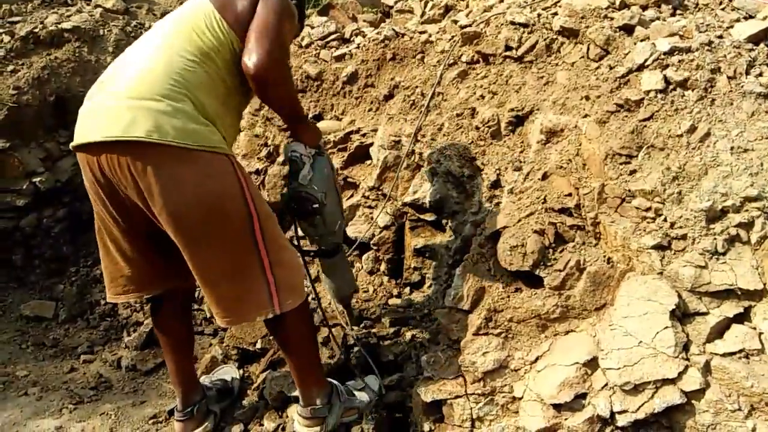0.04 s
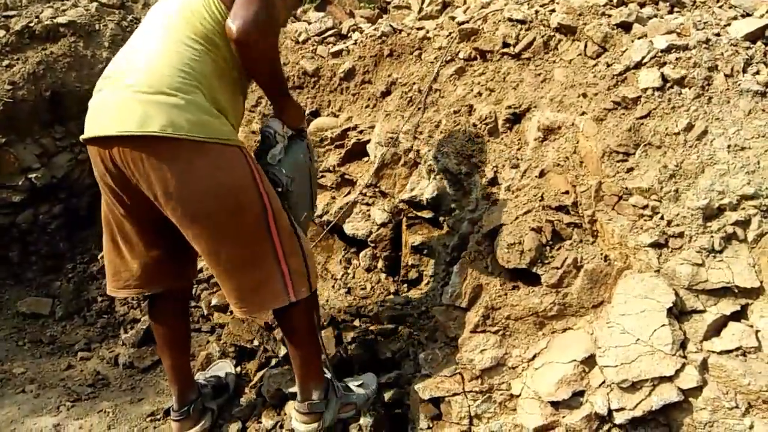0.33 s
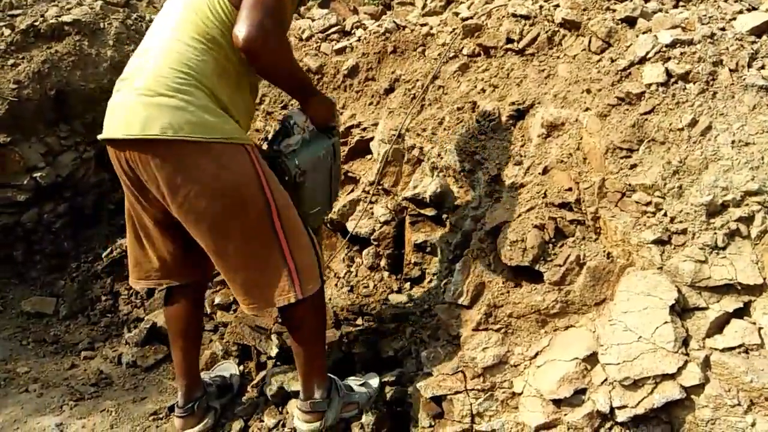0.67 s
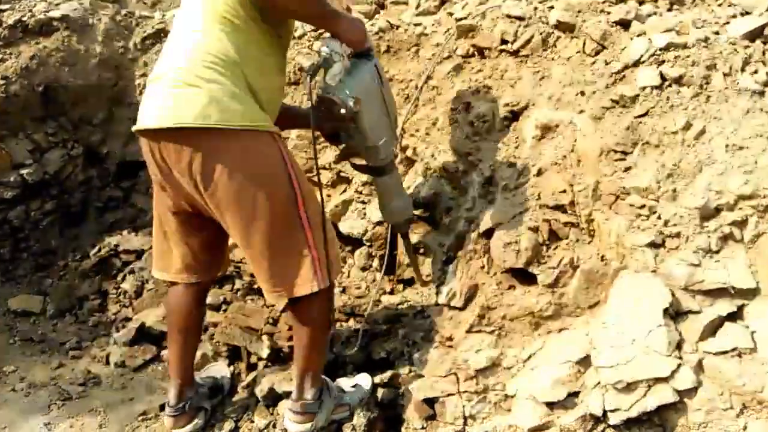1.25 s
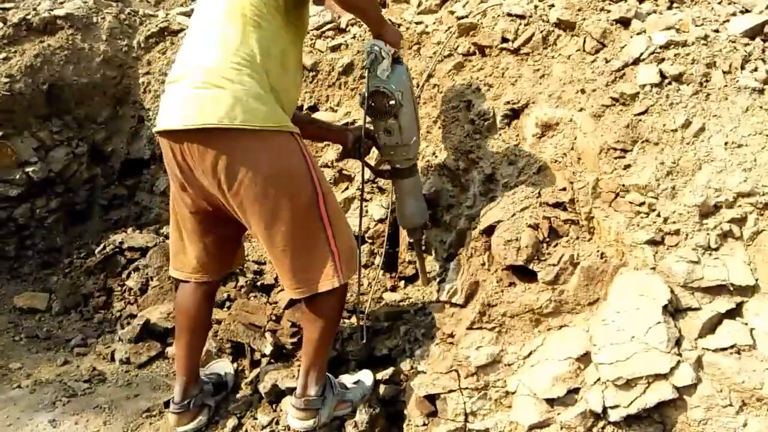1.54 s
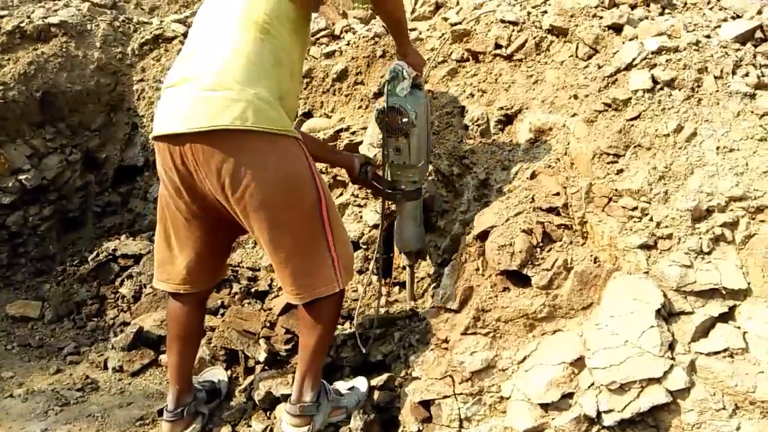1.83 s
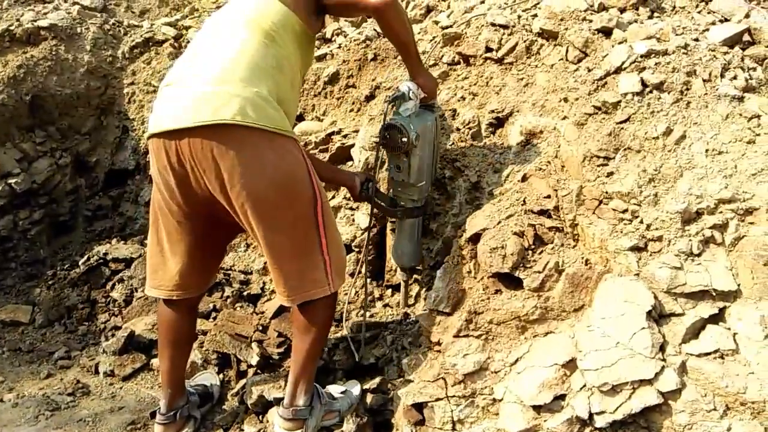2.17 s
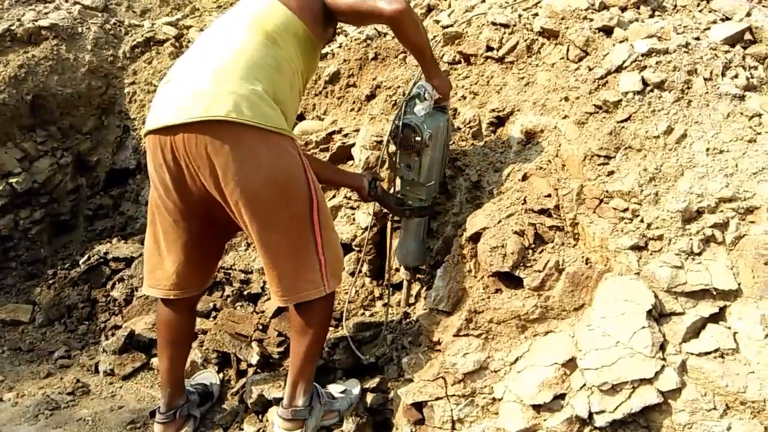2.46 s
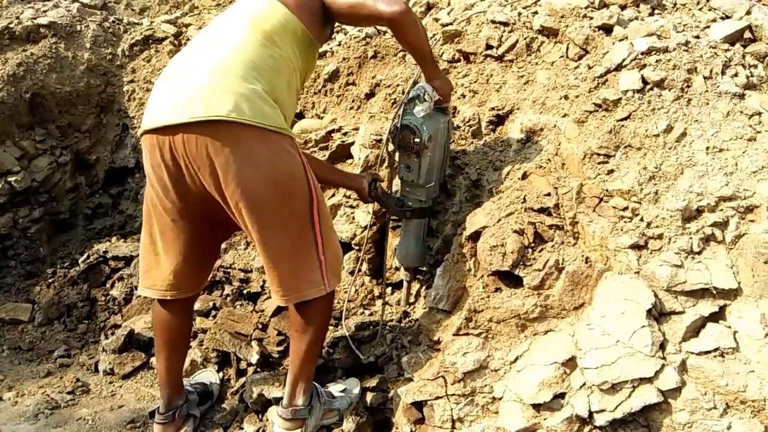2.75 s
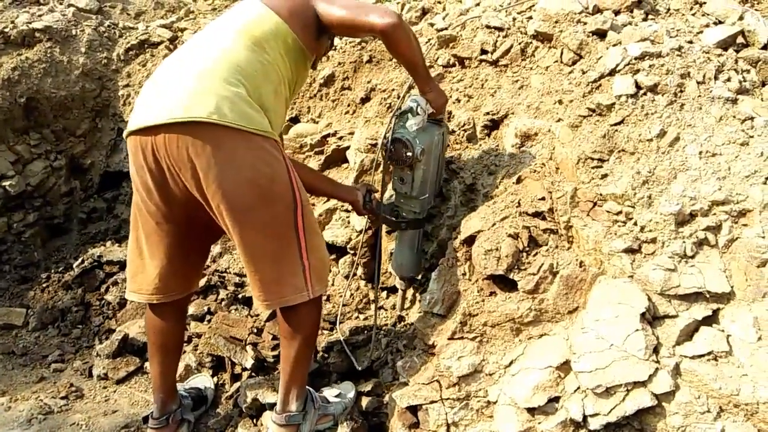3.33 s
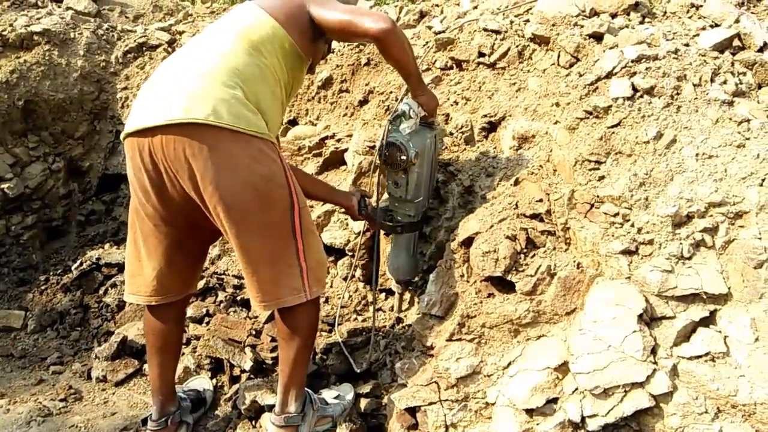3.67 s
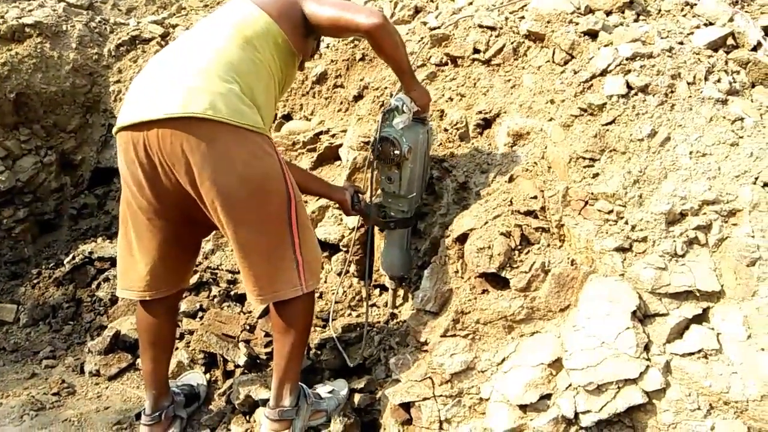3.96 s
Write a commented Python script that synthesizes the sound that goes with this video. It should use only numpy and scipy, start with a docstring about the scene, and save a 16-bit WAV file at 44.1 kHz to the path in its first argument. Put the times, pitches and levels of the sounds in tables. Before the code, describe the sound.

A handheld electric breaker clanks and scrapes as it is dragged over rocky ground outdoors, with wind bumping the microphone. Its motor then starts with a chattering whine and the chisel hammers rapidly into rock.

```python
"""Steel clanks and scrapes as a handheld electric breaker, winding down with a tiny squeak, is dragged
over rocky ground and set down, while air buffets the microphone. Its motor starts with a chattering
whine; the chisel rings loosely at first, then bites and hammers about 17 times a second. Each blow is
a thump of the piston in the housing, then the crack of steel on rock, thrown back by the rock face."""
import sys
import numpy as np
from scipy import signal
from scipy.io import wavfile
from scipy.ndimage import uniform_filter1d

SR = 44100
rng = np.random.default_rng(int(sys.argv[2]) if len(sys.argv) > 2 else 0)


def generate_wav(sig):
    """Save sig (samples, or channels by samples) to the path in sys.argv[1] as 16-bit PCM at SR."""
    pcm = np.round(np.clip(np.atleast_2d(sig).T, -1, 1) * 32767).astype(np.int16)
    wavfile.write(sys.argv[1], SR, pcm)


N = 176400

# chisel blows: t/s, strength/dB, extra ground thud/dB, extra brightness/dB
BLOWS = [(1.7701, -0.4, -0.5, 4.5), (1.848, 2.3, -7, 3.5), (1.916, 0.5, -4.5, 8), (1.9841, 1.2, 2.5, 5.5),
         (2.0487, -5, 2, 10), (2.1105, -3.5, 1, 3), (2.1702, -2.5, 4.5, 11.5), (2.2325, -1.8, -0.5, 6),
         (2.2923, 0.9, 8.5, 5.5), (2.3549, -0.8, 5, 3.9), (2.4142, 0.6, 1.8, 0.8), (2.474, -1.5, 4.8, 5.5),
         (2.5332, 1, 2, 2.5), (2.5917, 4.9, 0.5, -5.0), (2.65, 1.8, -3.2, 4.5), (2.7099, 5.5, -2, -5),
         (2.7688, 2.2, 1.3, -2), (2.8279, 4.8, -4, 1), (2.8873, 1.2, 6.5, 1.1), (2.9441, -5.5, 11, 10.5),
         (3.0048, -0.3, 5, 2), (3.062, -3, 1.4, 5), (3.1213, -3.5, 6.5, 3.7), (3.1804, 0, 4.5, -2.5),
         (3.2388, 2, 5, 2.8), (3.298, 1.5, 6, -2.5), (3.3543, 3.5, 0, -2.7), (3.4137, 0.3, 10.5, 1),
         (3.4721, 6.2, -1, -13.5), (3.5314, 0.5, 6.5, -2), (3.5896, 0.6, 7.5, -3), (3.6455, 0.2, 7.5, -1),
         (3.7056, -0.1, 9, -4.5), (3.763, 0, 6.5, -2), (3.8219, -1, 10.5, 1), (3.8794, -0.4, 4.5, 1.9),
         (3.939, 4.7, -10, -7.5), (3.9977, 4.5, 2.5, -2.5)]
# how firmly the chisel is pressed home: t/s, firmness (0 loose, 1 firm)
FIRMNESS = [(1.77, 0.22), (1.95, 0.052), (2.15, .33), (2.3, .7), (2.55, 0.64), (3.3, 0.65), (3.9, 0.94)]
# heavily damped modes of tool and rock: f/Hz, level/dB, t60/s
BODY_MODES = [(732, -17, 0.021), (936, -23.5, 0.021), (1106, -25, .04), (1328, -14, 0.0095),
              (1717, -10, 0.013), (2121, -21.5, 0.029), (2730, -35, 0.012), (3097, -24, 0.049),
              (3210, -21, 0.035), (3648, -25.5, 0.064), (4100, -22.5, 0.021), (5435, -18.5, 0.015),
              (6066, -19, 0.013)]
# free ring of the steel chisel: f/Hz, level/dB, t60/s
STEEL_MODES = [(886, -26, 0.087), (1557, -24.5, 0.06), (1996, -26, .11), (3020, -32, 0.15),
               (3240, -23, 0.11), (3760, -32, 0.16), (5650, -39, 0.087), (5950, -44, 0.072),
               (6960, -45, .08), (8040, -33.5, 0.11), (8320, -40, .1), (11750, -39.5, .1),
               (12700, -44, .11), (13320, -46, .11)]


def amp(db):
    """Decibels to gain."""
    return 10 ** (np.asarray(db) / 20)


def curve(points, t):
    """Reads a table of points joined by straight lines."""
    return np.interp(t, *np.transpose(points))


def add(mix, start_s, sound):
    """Drops a sound into the mix at a time."""
    part = mix[max(round(start_s * SR), 0):][:len(sound)]
    part += sound[:len(part)]


def colour(x, spectrum):
    """Minimum-phase EQ of unit energy: the spectrum sets the tone, not the overall level."""
    hz, db = np.transpose(spectrum)
    bins_hz = abs(np.fft.fftfreq(4096, 1 / SR))
    log_gain = np.log(amp(np.interp(np.log(bins_hz + 1), np.log(hz + 1), db)))
    taps = np.fft.ifft(np.exp(np.conj(signal.hilbert(log_gain)))).real
    return signal.oaconvolve(x, taps / np.linalg.norm(taps))[:len(x)]


def shelf(x, hz, db, kind):
    """Boosts or cuts everything below or above a frequency."""
    bands = {}
    for side in ("low", "high"):
        crossover = np.tile(signal.butter(2, hz, side, fs=SR, output="sos"), (2, 1))
        bands[side] = signal.sosfilt(crossover, x)
    return bands["low"] + bands["high"] + (amp(db) - 1) * bands[kind]


def wander(samples):
    """Smooth random drift of unit size."""
    drift = uniform_filter1d(uniform_filter1d(rng.standard_normal(N), samples), samples)
    return drift / drift.std()


def burst(t, rise_s, t60_s):
    """A quick spray of crushed grit."""
    return rng.standard_normal(len(t)) * (1 - np.exp(-t / rise_s)) * amp(-60 * t / t60_s)


def ring(t, modes, spread_db, detune):
    """Dying modes, struck a little differently each time; the high ones shift most."""
    hz, db, t60 = np.transpose(modes)[:, :, None]
    size, shift = rng.standard_normal((2, len(modes), 1))
    phase = 2 * np.pi * rng.random((len(modes), 1))
    hz = hz * (1 + detune * shift * np.sqrt(hz / hz.mean()))
    return (amp(db + spread_db * size - 60 * t / t60) * np.sin(2 * np.pi * hz * t + phase)).sum(0)


def air_and_ground():
    """The bed: quiet outdoor air, gusts buffeting the microphone, grit under the dragged steel."""
    # spectra of the outdoors, the gusts and the scrape: f/Hz, level/dB
    air_eq = [(18, -35.5), (30, -21), (123, -14), (217, -27.5), (281, -11), (354, -16), (592, 0),
              (674, -12.5), (1130, -2), (3070, -24), (14000, -29)]
    wind_eq = [(15, -47), (28, -22), (45, 3.5), (62, 3), (100, -7.5), (170, -14), (300, -28), (800, -44.5),
               (3000, -81)]
    scrape_eq = [(60, -12), (300, -0.5), (850, 6.5), (1300, 0.5), (2000, -7), (3000, -22.5), (6000, -39),
                 (14000, -45)]
    # swells of the gusts and the dragging: t/s, level/dB
    wind_fader = [(0, -46.5), (.08, -74), (.142, -52), (.19, -62), (.25, -20), (.29, -50), (.336, -49),
                  (.375, -37.5), (.48, -41.5), (.58, -38.5), (.635, -56), (.665, -27.5), (.695, -44),
                  (.72, -25.5), (.766, -56), (.808, -40), (.86, -64), (1.02, -65), (1.09, -52.5),
                  (1.16, -62), (1.22, -49.5), (1.28, -54), (1.36, -43), (1.41, -48), (1.6, -66), (2.0, -51),
                  (2.4, -42.5), (3, -67), (4, -51)]
    drag_fader = [(0, -41), (.08, -71), (.125, -61), (.148, -51), (.22, -54.5), (.264, -37), (.296, -55.5),
                  (.35, -60), (.39, -47.5), (.45, -53), (.5, -42.5), (.6, -58.5), (.69, -54), (.73, -53.5),
                  (.78, -60), (1.0, -67), (1.38, -65.5), (1.44, -36), (1.6, -64.5)]
    t = np.arange(N) / SR
    wind, air, grit = rng.standard_normal((3, N))
    grit = grit * (rng.random(N) < 5000 / SR)  # about 5000 grains a second
    gusts = amp(curve(wind_fader, t)) * colour(wind, wind_eq)
    scrape = amp(curve(drag_fader, t)) * colour(grit / grit.std(), scrape_eq)
    return amp(-73.5) * colour(air, air_eq) + gusts + scrape


def rock_face(x):
    """A short scatter of reflections from the broken slope."""
    # spectrum of the reflections: f/Hz, level/dB
    echo_eq = [(100, -18), (700, -5.5), (1700, 0.5), (3300, -2), (6000, -0.5), (8500, 6.5), (14000, -1)]
    delay_s, t60_s, echoes_per_s = .0071, .11, 4000
    t = np.arange(SR // 3) / SR
    taps = rng.choice([-1., 1.], len(t)) * (rng.random(len(t)) < echoes_per_s / SR)
    taps *= (t > delay_s) * amp(-60 * t / t60_s)
    return amp(-11) * signal.oaconvolve(x, colour(taps / np.linalg.norm(taps), echo_eq))[:N]


def squeak():
    """A tiny metallic squeak as the tool winds down."""
    peak_s, width_s = .074, .011
    t = np.arange(N) / SR
    hz = 7100 * (1 + .0094 * wander(40))
    tone = np.sin(2 * np.pi * np.cumsum(hz) / SR)
    return amp(-50) * tone * np.exp(-((t - peak_s) / width_s) ** 2)


def motor():
    """Gears coast to a stop, then restart; each piston compression swells the chatter, sags the whine."""
    # spectrum of the gear chatter: f/Hz, level/dB
    chatter_eq = [(60, -7), (450, -6), (1000, 2), (1900, 3.5), (2700, -1), (3400, 3.5), (4700, -18),
                  (5800, -16), (7200, -18.5), (10000, -26), (14000, -23)]
    # rides on the whole motor and on the chatter's treble: t/s, level/dB
    motor_fader = [(0, -47), (.08, -48.5), (.12, -66), (.3, -82), (1.62, -87), (1.635, -32.5),
                   (1.685, -44.5), (1.7, -32.5), (1.74, -34.5), (1.8, -33), (2.0, -27.5), (2.2, -30.5),
                   (2.7, -32.5), (3.3, -35.5), (4, -35)]
    treble_fader = [(.05, -10), (1.65, -1), (2.0, -6.5), (2.8, -3), (3.3, -3), (3.9, -9)]
    # gear whine before waver and sag: t/s, f/Hz
    whine_pitch = [(1.63, 3600), (1.75, 4220), (2.0, 4380), (2.4, 4450), (3.0, 4380), (3.5, 3880),
                   (4, 3760)]
    lead_s, width_s, swell_db = .0046, .008, 13  # the load peaks just ahead of each blow
    waver, sag = .0074, .069
    t = np.arange(N) / SR
    load = sum(np.exp(-((t - blow_s + lead_s) / width_s) ** 2) for blow_s, *_ in BLOWS)
    teeth = rng.standard_normal(N) * (rng.random(N) < 7000 / SR)  # about 7000 ticks a second
    chatter = colour(teeth / teeth.std(), chatter_eq) * amp(swell_db * load * curve(FIRMNESS, t))
    chatter = shelf(chatter, 4000, curve(treble_fader, t), "high")
    speed = 1 + waver * wander(200) - sag * uniform_filter1d(load, size=900)
    whine = np.sin(2 * np.pi * np.cumsum(curve(whine_pitch, t) * speed) / SR)
    return amp(curve(motor_fader, t)) * (chatter + amp(-11) * whine)


def knocks():
    """The tool bumps on stones and the loose chisel clanks in its holder."""
    # bumps and rattles: t/s, level/dB, brightness/dB, hollow thud/dB, contact ring f/Hz
    hits = [(.001, -18, -5, -18, 1885), (.149, -9.5, -12.5, -6, 685), (.179, -16.5, -13, -14, 1724),
            (0.5279, -10.5, 0, -28, 3090), (.544, -17.5, 0, -2, 5500), (.557, -13.5, 1, -18, 3580),
            (.571, -18.5, 2, -20, 2880), (0.636, -29.5, -19, -17, 3030), (0.712, -22.5, -20, -13, 970),
            (1.398, -19, -16.5, 0, 3100), (1.4225, -16.5, 7, -8, 3700), (1.435, -8.5, -3, 7, 3710),
            (1.4425, -2.5, 5.5, 4, 932), (1.474, -27.5, 7, 3, 3800), (1.506, -21, 14.5, -9, 3750),
            (1.559, -28.5, -5, -4, 3300), (1.6272, -17, -1.5, 3, 3200), (1.662, -15, 3, 6, 2953),
            (1.817, -13, 5, -3, 3300), (1.866, -12, -4, -6, 3590), (1.896, -7, -1, -4, 3400),
            (1.9585, -5.5, 1, -6, 3460), (2.012, -4, -2, -4, 1120)]
    # spectrum of a knock's noise: f/Hz, level/dB
    knock_eq = [(60, -30), (280, -5), (480, -18), (680, -6.5), (930, 4), (1300, -1), (1750, 1),
                (2400, -8.5), (3050, 1), (3650, -1), (4900, -19), (5600, -11), (6600, -22), (10000, -31),
                (14000, -29)]
    rise_s, contact_t60_s = .0025, .049
    out, t = np.zeros(N), np.arange(SR // 4) / SR
    attack = 1 - np.exp(-t / rise_s)
    for start_s, db, bright_db, thud_db, ring_hz in hits:
        clack = amp(-6.5) * colour(burst(t, rise_s, t60_s=.038), knock_eq)
        steel = amp(-10) * ring(t, STEEL_MODES, spread_db=2, detune=.011)
        thud = amp(thud_db - 7) * ring(t, BODY_MODES, spread_db=2.5, detune=.02)
        contact = amp(-14 - 60 * t / contact_t60_s) * np.sin(2 * np.pi * ring_hz * t)
        clank = clack + steel + attack * (thud + contact)
        add(out, start_s, amp(db) * shelf(clank, 2600, bright_db, "high"))
    return out


def piston():
    """The air cushion kicks the housing just before each blow and again on the rebound."""
    # modes of the housing: f/Hz, level/dB relative to the kick, t60/s
    housing_modes = [(181.5, -24.5, 0.3), (272.6, -14.5, 0.25), (308.3, -15, 0.37), (406.2, -13, 0.24),
                     (600, -3, 0.052)]
    # strength of the kick: t/s, level/dB
    kick_fader = [(1.77, -30), (2.0, -27), (2.15, -25.5), (2.3, -16), (2.55, -13.5), (2.9, -13.5),
                  (3.3, -16.5), (3.9, -17.5)]
    kick_hz, width_s = 305, .0027
    lead_s, rebound_s, preroll_s = .0039, .0064, .01
    out, t = np.zeros(N), np.arange(SR // 4) / SR - preroll_s
    kick, rebound = (-np.sin(2 * np.pi * kick_hz * age) * np.exp(-(age / width_s) ** 2)
                     for age in (t, t - rebound_s))
    after = np.maximum(t, 0)
    hum = -sum(amp(db - 60 * after / t60) * np.sin(2 * np.pi * hz * after)
               for hz, db, t60 in housing_modes)
    thump = kick + amp(-7) * rebound + amp(-4.5) * hum
    for blow_s, *_ in BLOWS:
        add(out, blow_s - lead_s - preroll_s, amp(curve(kick_fader, blow_s)) * thump)
    return out


def chisel():
    """Steel cracks into rock; it rings out while loose and knocks hollowly once buried."""
    # spectrum of the crack: f/Hz, level/dB
    crack_eq = [(60, -38), (300, -49), (500, -12), (720, -6), (1700, -0.5), (2500, -2), (3400, 3.5),
                (4500, -19.5), (5900, -7), (7300, -22), (8400, -19.5), (9600, -31), (12000, -23),
                (14000, -23)]
    # modes of the buried bit: f/Hz, level/dB, t60/s
    hollow_modes = [(718, 0.5, 0.031), (894, -5.5, 0.04), (1087, -7, 0.032)]
    # its hollow knock growing as it sinks: t/s, level/dB
    hollow_fader = [(1.77, -37), (2.9, -18), (3.3, -17), (3.7, -12), (4, -9)]
    out, t = np.zeros(N), np.arange(SR // 5) / SR
    attack = 1 - np.exp(-t / .0007)
    for start_s, db, thud_db, bright_db in BLOWS:
        crack = amp(-9) * colour(burst(t, rise_s=.00033, t60_s=.025), crack_eq)
        body = amp(.5) * attack * ring(t, BODY_MODES, spread_db=2.5, detune=.02)
        impact = shelf(crack + body, 1284, thud_db, "low")
        impact = shelf(impact, 3300, bright_db, "high")
        choke_db = -18.5 * curve(FIRMNESS, start_s)
        steel = amp(choke_db) * ring(t, STEEL_MODES, spread_db=3, detune=.0024)
        hollow = attack * ring(t, hollow_modes, spread_db=1.5, detune=.0042)
        add(out, start_s, amp(db) * (impact + steel) + amp(curve(hollow_fader, start_s)) * hollow)
    return out


def scene():
    """The tool sits dead centre; piston and bed stay dry, the rest bounces off the rock face."""
    tool = chisel() + knocks() + motor() + squeak()
    mix = tool + rock_face(tool) + piston() + air_and_ground()
    return np.array([mix, mix])


def record(dry):
    """Soft-clips the loudest peaks, then trims the rumble and the extreme top."""
    ceiling = .74
    rounded = dry / (1 + (dry / ceiling) ** 4) ** (1 / 4)
    low_cut = signal.butter(4, 40, "high", fs=SR, output="sos")
    high_cut = signal.firwin(255, 14450, window=("kaiser", 8), fs=SR)
    return signal.oaconvolve(signal.sosfilt(low_cut, rounded), high_cut[None], "same")


dry = scene()
out = record(dry)
generate_wav(out)
```